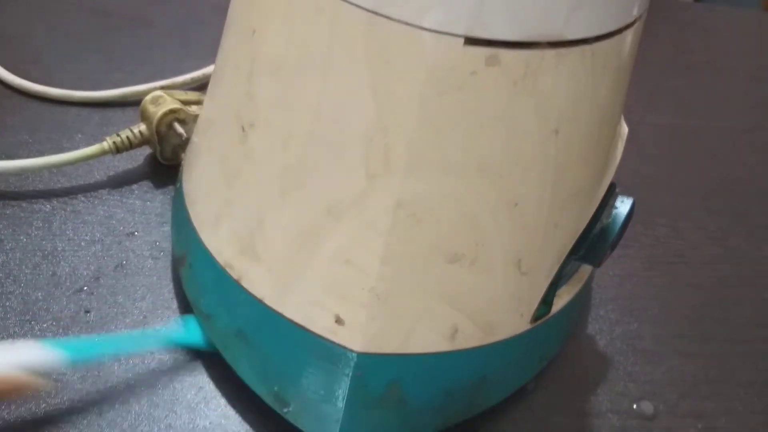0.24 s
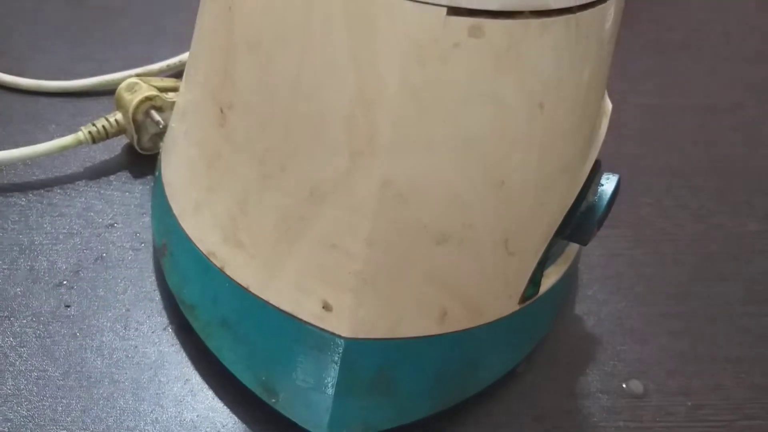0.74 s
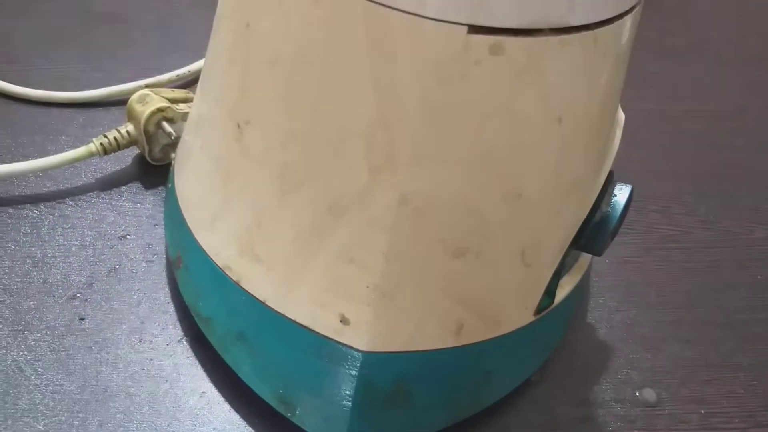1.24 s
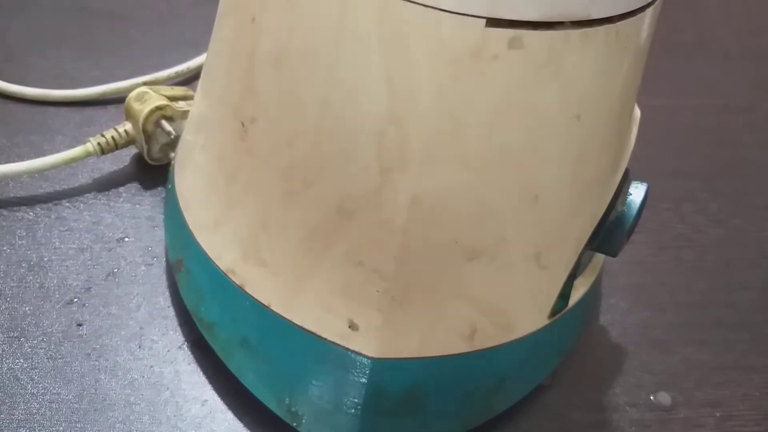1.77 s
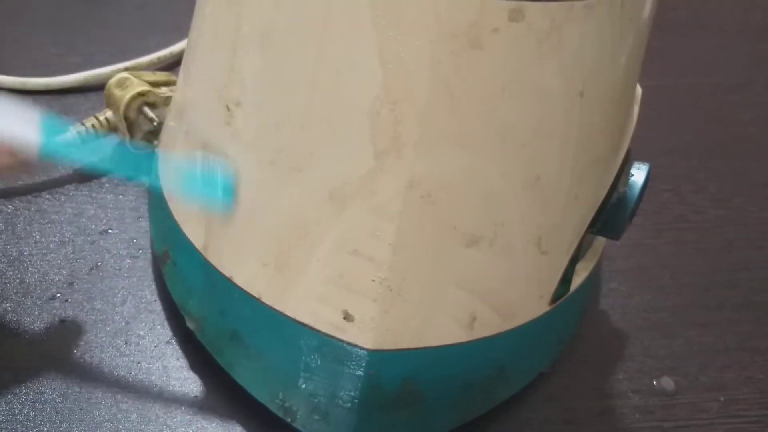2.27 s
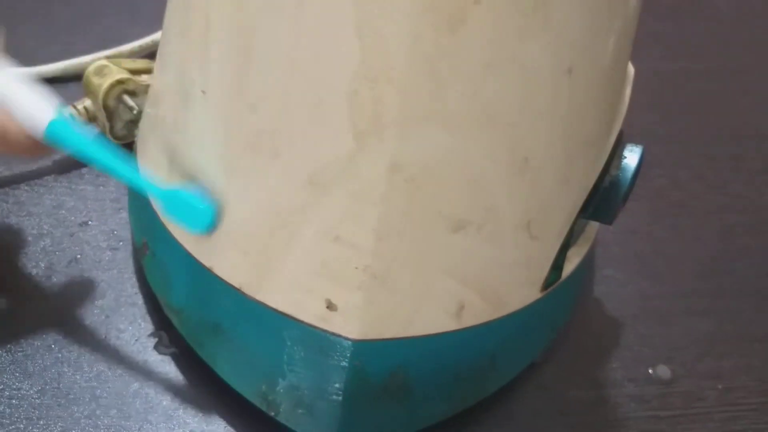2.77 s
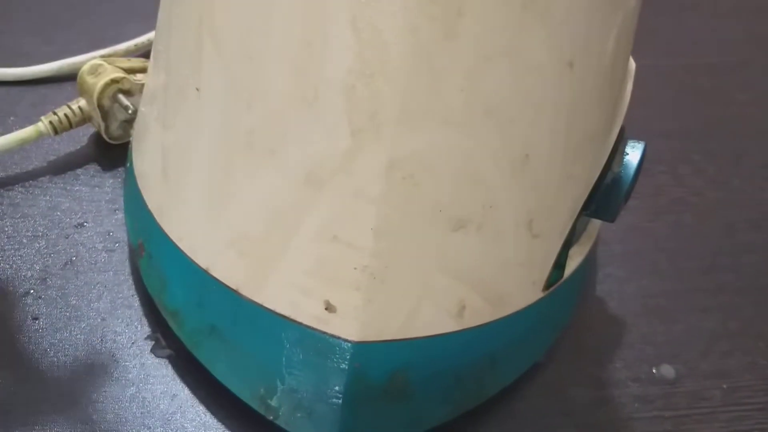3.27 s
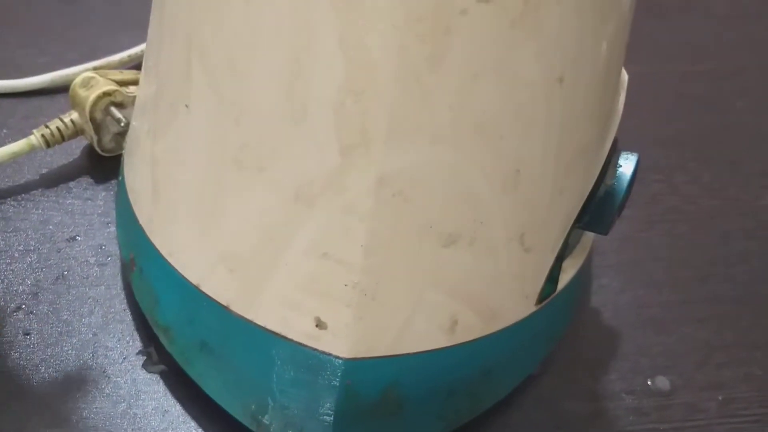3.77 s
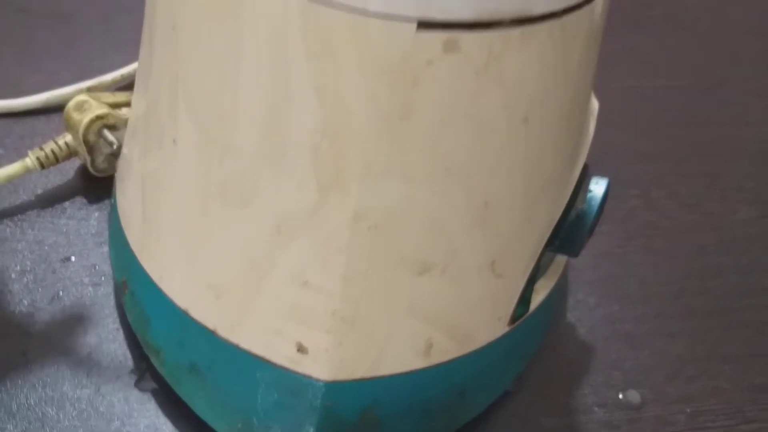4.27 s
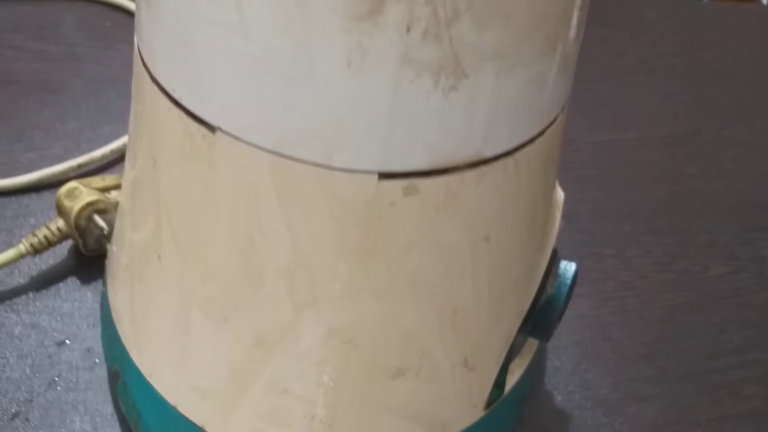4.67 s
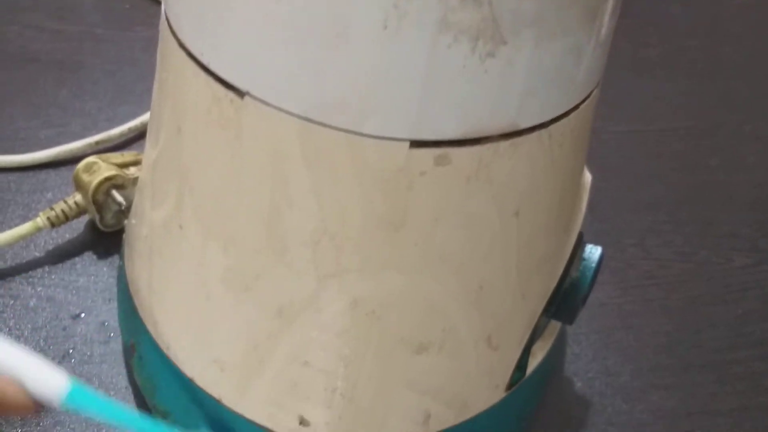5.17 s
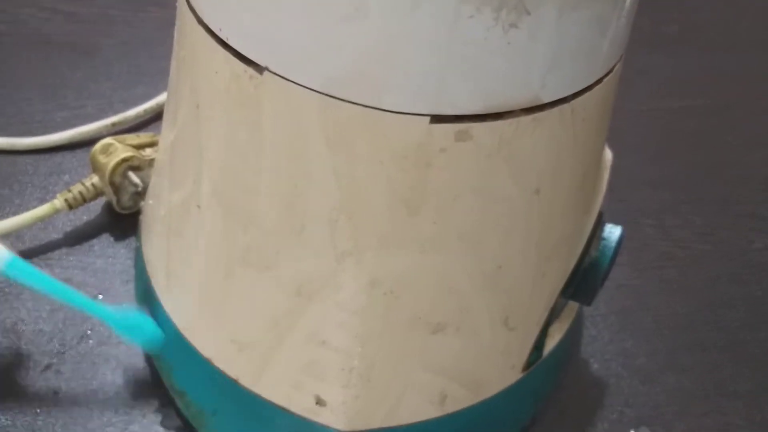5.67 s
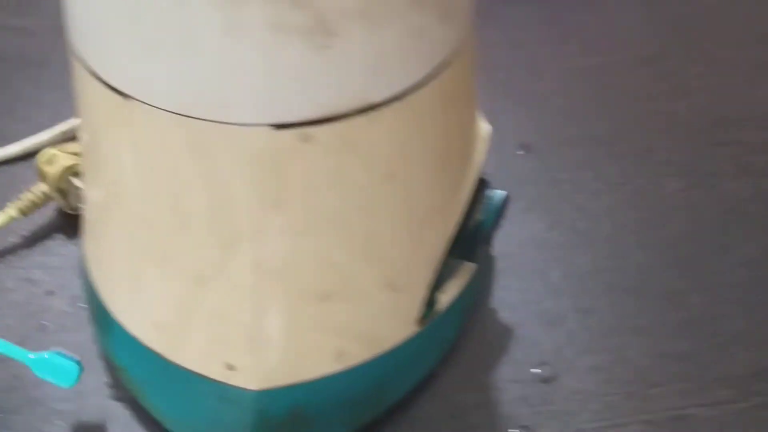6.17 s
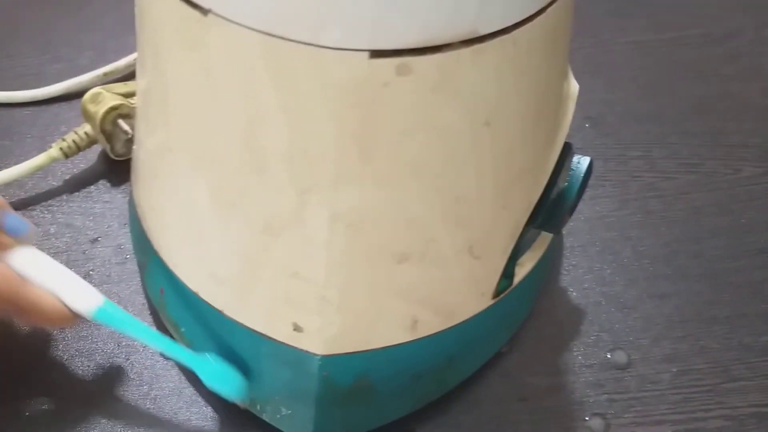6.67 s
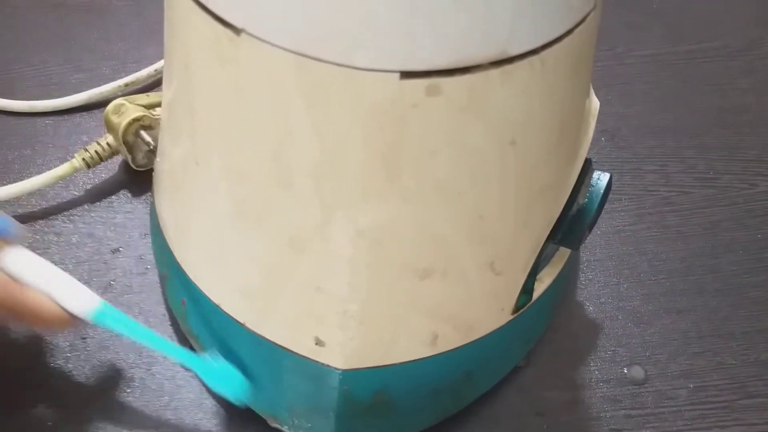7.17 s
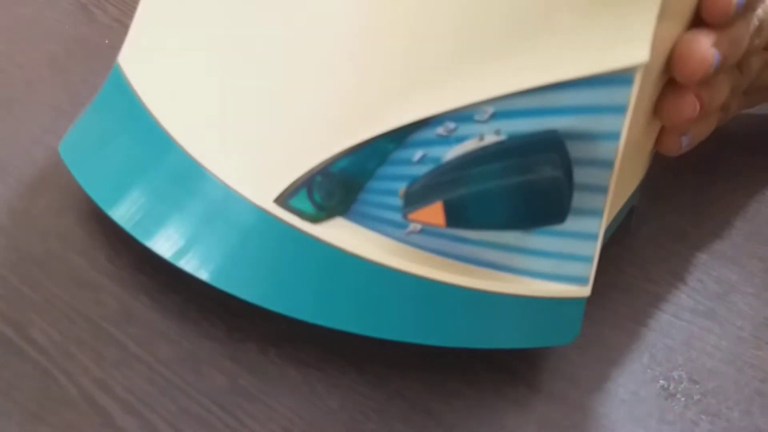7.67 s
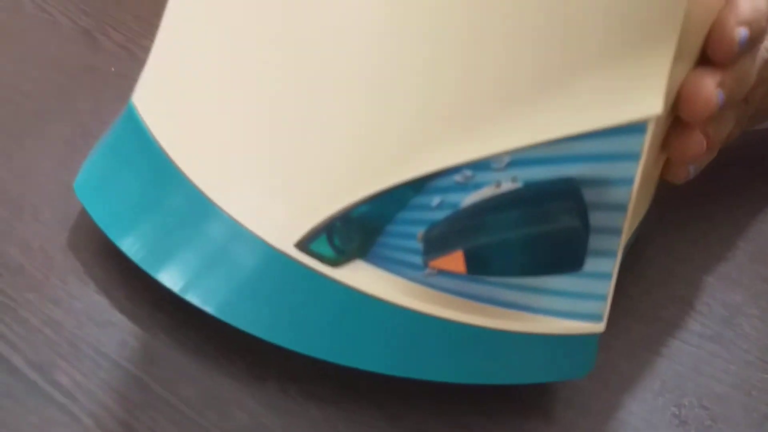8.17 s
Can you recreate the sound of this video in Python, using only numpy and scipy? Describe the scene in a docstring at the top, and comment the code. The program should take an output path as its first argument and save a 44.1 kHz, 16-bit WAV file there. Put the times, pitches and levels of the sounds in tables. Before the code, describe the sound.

A toothbrush scrubs a hollow plastic appliance housing, heard close and almost in mono, with slight kitchen reverberation. Loud, sharp clicks of the brush head come at about 0.15 seconds, followed by hard strokes and hollow knocks around 0.7 to 0.9 and one sharp crack at 1.2. The brushing stays light until about 2.3, then builds into high, hissy scratching, roughly five or six strokes a second. A click lands at 4.3, with a brief pause just after. The scrubbing resumes and turns harder and raspier around 5.7 to 6.1, with a cluster of sharp knocks that leave loose parts faintly ringing. Even strokes continue to about 7.4, then the rubbing becomes thinner and quieter. Near 8.3 come a short rasp and a soft scrape as the housing shifts on the table. A very faint low rumble and room air lie underneath.

```python
"""A toothbrush scrubs the plastic housing of a kitchen appliance, heard close and almost in mono.
Stick-slip friction of the bristles gives scratch, hiss and fizz; the brush head rasps and drives the
thin shell and the hollow body. These six paths filter the force of every stroke and knock.
Knocks also set loose parts ringing, and the kitchen reverberates. Near the end a hand shifts the
housing on the table. Underneath, a low rumble swells and fades with faint room air."""
import sys
import numpy as np
from scipy import signal
from scipy.fft import rfft, irfft, next_fast_len
from scipy.io import wavfile
from scipy.ndimage import map_coordinates

SR = 44100
rng = np.random.default_rng(int(sys.argv[2]) if len(sys.argv) > 2 else 0)


def output_pcm(signal):
    """Save a mono or channel-first signal as 16-bit PCM at the path in sys.argv[1].

    Samples are clipped to [-1, 1] before scaling.
    """
    pcm = np.clip(np.atleast_2d(signal).T, -1, 1) * 32767
    wavfile.write(sys.argv[1], SR, np.round(pcm).astype(np.int16))


N = 371747

# brush strokes; the last three columns are offsets from the level:
# (start [s], lift [s], level [dB], swell [dB], shell [dB], fizz [dB], rasp [dB])
STROKES = [(-.04, .044, -42, 1, -18.5, -3, -15.5), (0.062, 0.132, -45.5, 15, -10, -4.5, -10.5),
           (0.627, 0.666, -47, 10.5, -11.5, -15, -23.5), (0.695, 0.733, -45, 0.5, -11, -22, -14),
           (0.746, 0.85, -24.5, -3, -24.5, -13, -17.5), (.82, 1.05, -31, -25, -17, -10, -13),
           (1.081, 1.123, -48, -1.5, -34, -9.5, -24.5), (1.148, 1.205, -53, 3.5, -38, -9, -24.5),
           (1.3, 1.433, -56, 1.5, -21.5, -15, -8.5), (1.452, 1.54, -52, -6, -18.5, -13.5, -22.5),
           (1.543, 1.59, -53, 3.5, -35.5, -7.5, -30.5), (1.76, 1.935, -62.5, -8, -25, -9, -23.5),
           (1.964, 2.122, -61, 10.5, -31, -8, -34), (2.14, 2.256, -56, 9.5, -35.5, -6, -31),
           (2.289, 2.418, -54, 12.5, -34, -5.5, -25), (2.428, 2.538, -51.5, 14, -43, -6.5, -23),
           (2.54, 2.753, -41, -2, -37, -4.5, -29), (2.747, 2.963, -45.5, 9, -28, -2.5, -22),
           (2.958, 3.137, -30, -16.5, -26, 1.5, -19), (3.134, 3.337, -45.5, 8, -37, 0, -34),
           (3.343, 3.473, -46, 5, -32, 1, -39), (3.491, 3.602, -37.5, -3, -36, -0.5, -43.5),
           (3.632, 3.742, -48, 9, -34.5, 0.5, -44), (3.76, 3.894, -43.5, 3.5, -32, 0, -43),
           (3.895, 3.93, -37.5, 2, -39, 3, -50), (3.953, 4.123, -38.5, -2.5, -34, 0, -42),
           (4.145, 4.228, -57.5, -8.5, 7.5, -18, 1), (4.223, 4.322, -52.5, 10, -13, -9, -21),
           (4.337, 4.49, -36, -4, -12.5, -6.5, -15.5), (4.636, 4.811, -62, 27.5, -29.5, -9.5, -28.5),
           (4.806, 4.893, -42, -2.5, -20, -7, -10.5), (4.921, 5.074, -42, 0, -20, -8, -13.5),
           (5.119, 5.26, -37, -0.5, -30.5, -8, -20), (5.311, 5.438, -41.5, -1, -19.5, -6, -9.5),
           (5.491, 5.641, -47, 10.5, -24, -5, -17), (5.696, 5.802, -44.5, 11.5, -8, -7.5, -10.5),
           (5.787, 5.95, -37, -7.5, -0.5, -6, 4), (5.962, 6.12, -38, -31, 3.5, -2.5, 3),
           (6.212, 6.256, -44.5, 0, -29, -10, -28), (6.297, 6.387, -37.5, -2, -29.5, -8.5, -25.5),
           (6.424, 6.553, -41, 3.5, -17.5, -7, -10), (6.588, 6.709, -39, -1.5, -21.5, -6.5, -14),
           (6.748, 6.896, -44.5, 5, -15.5, -5.5, -9.5), (6.925, 7.073, -39.5, -3.5, -22.5, -6.5, -12.5),
           (7.089, 7.215, -44.5, 7, -17, -8.5, -9.5), (7.254, 7.435, -45, -9, -17.5, -4.5, -19),
           (7.428, 7.617, -56.5, 7.5, -14.5, -3.5, -15.5), (7.58, 8.07, -54, -1, -20, -2, -17),
           (8.044, 8.228, -58.5, 4.5, -13, -2.5, -8.5), (8.205, 8.326, -52, -2.5, 2.5, -0.5, 2),
           (8.32, 8.45, -57, -1.5, -21, 0, -5.5)]
# knocks of the brush head; the last four columns are offsets from the level:
# (time [s], level [dB], treble [dB], shell [dB], body [dB], room [dB])
KNOCKS = [(0.096, -38, 12, -18, -26, -6.5), (0.1271, -2, -3, -15.5, -19, -26),
          (.1413, 1, -32, -16.5, -26, -14), (0.153, -9.5, 1.5, -6, -14, -8),
          (0.6314, -24.5, -7, -24, -3, -5), (0.6654, -14, -14, -24.5, -24, -38),
          (0.71, -17.5, -20, -17.5, -12, -31), (0.766, -9.5, -9.5, -13.5, -18.5, -13.5),
          (0.785, -6.5, -16, -15.5, -45, -20), (0.8333, -10, -5.5, -12, -36, -10.5),
          (1.1053, -35.5, -12, -31, -46, -9.5), (1.2294, 1.5, -4, -23, -28.5, -15.5),
          (2.911, -23, 2, -17, -49, -33), (3.1717, -20.5, -2, -29, -47, -12),
          (3.319, -39, 12.5, -30, -44, -20), (3.6514, -43, 9, -14, -32, -10),
          (3.8129, -26.5, 4.5, -22, -35, -10), (3.9284, -41.5, 24, -34, -38, -22),
          (3.9874, -28.5, 5.5, -35, -25, -19), (4.1617, -23.5, -4, -8, -25, -19.5),
          (4.257, -41, 3, -20, -40, -15), (4.3243, -13, -2.5, -5.5, -40, -15),
          (4.661, -50, 6, -18, -40, -12), (4.8883, -25.5, -11, -21, -28, -17),
          (5.222, -19.5, -2, -49, -53, -15), (5.2672, -23, -22, -17, -48, -13),
          (5.5704, -33, 5, -17, -17, -14), (5.592, -23.5, -16.5, -13, -13.5, -34),
          (5.6591, -29, 3, 1.5, -32, -14), (5.7722, -18.5, -27, -6, -45, -20),
          (5.8343, -25, 2, 5, -35, -32), (5.8631, -3, -7, -10.5, -49, -20),
          (5.9136, -20.5, -12, -11, -32, -8), (5.9746, -14, -7.5, -14, -45, -12),
          (5.981, -13, -5.5, -31, -50, -28.5), (6.184, -55.5, -10, -0.5, 8.5, -18),
          (6.2057, -58, -3, 0.5, 14, -28), (6.241, -42.5, 9, -30, -26, -19),
          (6.4637, -30, -12, -4, -51, -14), (7.1147, -30.5, 2, -25, -41, -21),
          (7.165, -61, -10, -3, -2, -22), (7.5524, -44, -9.5, -3.5, -27, -20)]
# coupling at the point of contact:
# (start [s], scratch [dB], wall whistle [dB], body [dB], knock rasp re shell [dB], knock ring [dB])
COUPLING = [(0, 1.5, 0.5, -26.5, 9.5, -47.5), (.62, 6.5, 0, -6.5, -8, -41),
            (.74, 4, 0.5, -3.5, -8.5, -37.5), (1.07, 5.5, -1, -22, -0.5, -38),
            (1.75, -0.5, -1, -24, -0.5, -46), (3.165, 4, -1.5, -21, -8.5, -55.5),
            (4.13, -3.5, -1, -32, -16, -49.5), (4.63, 0, 2.5, -30.5, -0.5, -48),
            (6.17, -0.5, 2, -29, -2.5, -43), (7.25, 0.5, -12.5, -15, -2, -45.5),
            (8.05, 0.5, -9, -9.5, -3, -47)]
# scratch spectra: (frequency [Hz], relative density [dB])
SCRATCH = [(2120, -42), (3600, -11.5), (4890, 5), (5250, 4), (5650, 2), (6400, -11), (8320, -35.5),
           (14100, -120)]  # bristles on plastic
RIM = [(2600, -36), (3500, -21), (3900, -3), (4330, 3.5), (4720, -2.5), (5250, 1.5), (5800, -0.5),
       (6400, -19), (8300, -47.5)]  # two bands ring near the hollow rim
UPPER = [(2600, -44.5), (3600, -20), (4500, -4.5), (4900, -6), (5150, 5.5), (5450, -5.5), (5900, -4.5),
         (6400, -26), (8300, -54)]  # one rings on the upper wall
BACK = [(2500, -45), (3230, -18), (3600, -26), (4800, -12), (5150, 3), (5500, -11), (6400, -17),
        (8300, -50)]  # one whistles behind the housing
LATE_RUB = [(3700, -52), (4700, -6.5), (5400, -2.5), (6500, -9.5), (8300, -14.5), (9150, -3), (10300, -30)]  # from 7.27 s the rubbing sounds thinner, with a bright band near 9 kHz
# order of the scratch spectra; the last row only marks the end: (start [s], spectrum)
SPOTS = [(0, SCRATCH), (.62, RIM), (1.75, UPPER), (3.165, BACK), (4.14, SCRATCH),
         (7.27, LATE_RUB), (8.5, LATE_RUB)]
# spectra of the other five paths: (frequency [Hz], relative density [dB])
HISS = [(3760, -39.5), (6400, -10.5), (6850, -4), (8190, 6), (10000, -11), (13000, -47), (22000, -120)]  # bristles
FIZZ = [(5880, -39.5), (10000, -4), (13800, 2.5), (15900, -5)]  # bristle tips
RASP = [(1290, -33), (2200, -14.5), (2730, 5), (3600, 6), (4680, -6), (7920, -120)]  # handle and head
SHELL = [(500, -47.5), (850, -9), (1160, 0), (1320, 6.5), (2200, -0.5), (2860, -25), (4840, -120)]  # thin wall
BODY = [(120, -24.5), (200, 0), (411, 1.5), (705, -10), (850, -6), (1100, -37.5), (1870, -120)]  # hollow inside
# wall modes, one list each for scratch, rasp and shell: (frequency [Hz], bandwidth [Hz], gain [dB])
WALL_MODES = [
    [(5212, 92, -5.5)],
    [(2980, 300, -4), (3662, 370, -13.5)],
    [(997.4, 28, -13.5), (1200, 28, -11), (1396, 36, -10), (1595, 33, -5), (1916, 120, -10.5)],
]
# modes of loose parts in the housing: (frequency [Hz], level [dB], 60 dB decay time [s])
LOOSE_MODES = [(350, -12, .28), (802, -22, .4), (1071, -8, .45), (1238, 2, .38), (1733, -17, .3),
               (2143, -7, .5), (4260, 0, .3)]
# kitchen reverberation for scratch, hiss, fizz, rasp, shell and body: (60 dB decay time [s])
ROOM_T60 = [0.38, 0.33, 0.3, 0.39, 0.36, .35]
# level of the low rumble: (time [s], level [dB])
RUMBLE_LEVELS = [(0, -79), (.16, -62), (.35, -81), (.65, -92), (.82, -72), (1.1, -84), (2.37, -85.5),
                 (2.7, -76.5), (4.67, -78.5), (5.75, -74), (8.03, -73.5), (8.43, -70)]
# spectra of the lesser sources: (frequency [Hz], relative density [dB])
SHIFT = [(35, -40), (60, -21), (97, -1), (295, -8), (509, 3.5), (740, -6.5), (1430, -5), (2500, -7.5),
         (3250, -46), (5500, -120)]  # housing sliding on the table
RUMBLE = [(18, -50.5), (30, -26), (97, 2), (147, 2), (260, -17), (340, -66), (570, -120)]  # low rumble
AIR = [(120, -53), (200, -17.5), (340, -9.5), (589, -26.5), (5020, -15.5), (6480, -26.5), (8230, -9.5),
       (15900, -25)]  # quiet room
# stereo side signal: (frequency [Hz], level re mid [dB])
SIDE_LEVELS = [(40, -22.5), (150, -42.5), (1300, -56), (1550, -16.5), (2150, -12.5), (2500, -59.5),
               (8000, -61.5), (8600, -18), (10400, -14), (11300, -51)]

ATTACK_S, FALL_DB_PER_S = 0.037, 287  # the brush gathers speed; the sound dies after the lift
SCRATCH_PER_RASP, BODY_PER_SHELL, AIR_PER_RUMBLE = 0.29, 0.47, 0.6  # dB per dB
LEAN_DB = 1.5  # growth of rasp, shell and body as the head presses deeper along a stroke
HISS_REL_DB, AIR_DB = -5, -74.5
SHIFT_S, SHIFT_PEAK_DB, SHIFT_RISE_DB_PER_S, SHIFT_FALL_DB_PER_S = 8.27, -45, 250, 155
TOP_HZ = 16150


def brush():
    """Sliding friction drives the six paths; overlapping strokes add in power."""
    force = friction(flicks_per_s=600, spread_db=4.5, flick_share=.18, rough_db=1.5)
    start, lift, db, swell_db, shell_db, fizz_db, rasp_db = np.transpose(STROKES)
    t = np.arange(0, N + 32, 32)[:, None] / SR
    progress = np.clip((t - start) / (lift - start), 0, 1)
    level_db = db + swell_db * progress - FALL_DB_PER_S * np.maximum(t - lift, 0)
    stroke = np.clip((t - start) / ATTACK_S, 0, 1) * amp(level_db)
    pressed = stroke * amp(LEAN_DB * (progress - 2.5))
    scratch_db, _, body_db, *_ = coupling(start)
    tips_db = np.array([scratch_db + SCRATCH_PER_RASP * rasp_db, np.full_like(db, HISS_REL_DB), fizz_db])
    head_db = np.array([rasp_db, shell_db, body_db + BODY_PER_SHELL * shell_db])
    powers = np.hstack([stroke ** 2 @ amp(2 * tips_db.T), pressed ** 2 @ amp(2 * head_db.T)]).T
    envelopes = np.array([np.interp(np.arange(N) / SR, t[:, 0], np.sqrt(p)) for p in powers])
    # the patch under the bristles changes colour as it moves
    drift_db = 1.4 * np.array([wobble(18) for _ in powers])
    return envelopes * amp(drift_db) * force


def friction(flicks_per_s, spread_db, flick_share, rough_db):
    """Stick-slip friction: sliding noise plus impulses as single contacts let go, at unit rms."""
    size = amp(spread_db * np.clip(rng.standard_normal(N), -2, 2))
    flicks = (rng.random(N) < flicks_per_s / SR) * size * rng.choice([-1, 1], N)
    sliding = np.sqrt(1 - flick_share) * rng.standard_normal(N)
    force = sliding + np.sqrt(flick_share) * flicks / flicks.std()
    # contacts catch in bunches, so the force swells unevenly
    force *= amp(rough_db * wobble(150) + .7 * wobble(45))
    return force / force.std()


def coupling(time_s):
    """The driving point sets how strongly each part responds: the gains in dB in force at time_s."""
    rows = np.array(COUPLING)
    row = np.maximum(np.searchsorted(rows[:, 0], time_s, "right") - 1, 0)
    return rows[row, 1:].T


def rubbed_spots(force):
    """Source and filter: the scratch takes the spectrum of the spot being rubbed, and near the end a thinner,
    brighter one."""
    t = np.arange(N) / SR
    return sum(coloured(force * (t >= start) * (t < end), spectrum)
               for (start, spectrum), (end, _) in zip(SPOTS, SPOTS[1:]))


def wall(forces):
    """Forced resonance: the wall's modes swell and fade as the point of contact wanders."""
    return sum(resonance(force * amp(db + 5.5 * np.tanh(wobble(9))), hz, width_hz)
               for force, modes in zip(forces, WALL_MODES) for hz, width_hz, db in modes)


def knocks():
    """Impact excitation: returns a reverberant crack on each path, and the table's thump with ringing."""
    t = np.arange(int(.7 * SR)) / SR
    paths, thump_and_ring = np.zeros((6, N + len(t))), np.zeros(N + len(t))
    room_decay = amp(-60 * t / np.array(ROOM_T60)[:, None]) * (1 - np.exp(-t / 0.00067))
    thump = (1 - 700 * t) * np.exp(-700 * t) * (1 - np.exp(-3000 * t))  # one push on the table
    for start, db, treble_db, shell_db, body_db, room_db in KNOCKS:
        *_, rasp_db, ring_db = coupling(start)
        span = slice(round(start * SR), round(start * SR) + len(t))
        crack_noise, room_noise = rng.standard_normal((2, len(t)))
        crack = np.exp(-t * 350) * crack_noise
        crack[0] = 2.5  # the first contact is one sharp pulse
        path_db = np.array([0, treble_db, treble_db - 11, shell_db + rasp_db, shell_db, body_db])
        gains = amp(db - 8.5 + path_db)[:, None]
        paths[:, span] += gains * (crack + amp(room_db) * room_decay * room_noise)
        thump_and_ring[span] += amp(db + body_db - 9.5) * thump + loose_parts(t, db + ring_db)
    return paths[:, :N], thump_and_ring[:N]


def loose_parts(t, level_db):
    """Damped free vibration: each mode of the loose parts is a close pair, so it beats as it decays."""
    ring = np.zeros(len(t))
    for hz, mode_db, t60 in LOOSE_MODES:
        beat = 1 + .4 * np.cos(2 * np.pi * rng.uniform(8, 20) * t + rng.uniform(0, np.pi))
        fade = amp(level_db + mode_db - 60 * t / t60) * (1 - np.exp(-t / 0.0066))
        ring += fade * beat * np.sin(2 * np.pi * hz * t)
    return ring


def hand_shift():
    """Sliding friction: a palm pushes the housing a little over the table."""
    force = friction(flicks_per_s=580, spread_db=6, flick_share=0.15, rough_db=-1.5)
    t = np.arange(N) / SR - SHIFT_S
    level_db = SHIFT_PEAK_DB + np.minimum(SHIFT_RISE_DB_PER_S * t, -SHIFT_FALL_DB_PER_S * t)
    return coloured(amp(level_db) * force, SHIFT)


def background():
    """Amplitude-modulated noise: a low rumble and faint room air swell and fade together."""
    level_db = np.interp(np.arange(N) / SR, *np.transpose(RUMBLE_LEVELS))
    rumble_gain = amp(level_db + 2.7 * wobble(13))
    air_gain = amp(AIR_DB + AIR_PER_RUMBLE * (level_db - level_db.mean()))
    rumble = rumble_gain * coloured(rng.standard_normal(N), RUMBLE)
    return rumble + air_gain * coloured(rng.standard_normal(N), AIR)


def amp(db):
    """The decibel law: amplitude ratio of a level."""
    return 10 ** (np.asarray(db) / 20)


def along(points, hz):
    """Interpolation of (frequency [Hz], value) points on a logarithmic frequency axis."""
    knots_hz, values = np.transpose(points)
    return np.interp(np.log(hz + 1), np.log(knots_hz + 1), values)


def wobble(knots_per_s):
    """Smooth random modulation: a spline through Gaussian knots."""
    knots = rng.standard_normal(int(N * knots_per_s / SR) + 4)
    return map_coordinates(knots, [np.arange(N) * knots_per_s / SR])


def coloured(x, spectrum):
    """Minimum-phase filtering: x through a response of unit energy with this spectrum."""
    size = 2 ** 13
    closed = [(0, -120)] + list(spectrum) + [(SR / 2, -120)]
    magnitude = amp(along(closed, np.fft.rfftfreq(size, 1 / SR)))
    cepstrum = irfft(np.log(magnitude))
    cepstrum[1:size // 2] *= 2  # folding onto positive time makes the filter causal
    cepstrum[size // 2 + 1:] = 0
    response = irfft(np.exp(rfft(cepstrum)))[:size // 2]
    return signal.fftconvolve(x, response / np.linalg.norm(response))[:N]


def resonance(x, hz, width_hz):
    """A damped oscillator: x through one narrow resonance of unit energy."""
    radius = np.exp(-np.pi * width_hz / SR)
    feedback = [1, -2 * radius * np.cos(2 * np.pi * hz / SR), radius ** 2]
    return signal.lfilter(np.sqrt((1 - radius ** 2) / 2) * np.array([1, 0, -1]), feedback, x)


def stereo(mid):
    """Mid-side stereo: a weak, phase-shifted side signal colours left and right slightly differently."""
    size = next_fast_len(N + SR // 4)
    hz = np.fft.rfftfreq(size, 1 / SR)
    phase = along([(2000, 1.1), (8000, 1.9)], hz)  # left is stronger in the lows, right in the highs
    side = irfft(np.exp(1j * phase) * rfft(mid, size) * amp(along(SIDE_LEVELS, hz)), size)[:N]
    return np.array([mid + side, mid - side])


def scene():
    """Superposition: rubbing and knocks sound through the same paths, over the hand and background."""
    blows, thump_and_ring = knocks()
    scratch, hiss, fizz, rasp, shell, body = brush() + blows
    whistle_db = coupling(np.arange(N) / SR)[1]
    mid = rubbed_spots(scratch) + wall([scratch * amp(whistle_db), rasp, shell])
    for force, spectrum in (hiss, HISS), (fizz, FIZZ), (rasp, RASP), (shell, SHELL), (body, BODY):
        mid += coloured(force, spectrum)
    return stereo(mid + thump_and_ring + hand_shift() + background())


def record(dry):
    """Saturation and band limiting: peaks round off at full scale, and nothing passes above TOP_HZ."""
    clipped = dry / (1 + np.abs(dry) ** 6) ** (1 / 6)
    size = next_fast_len(N + SR // 4)
    lowpass = np.clip((TOP_HZ - np.fft.rfftfreq(size, 1 / SR)) / 300, 0, 1)
    return irfft(rfft(clipped, size) * lowpass, size)[:, :N]


dry = scene()
out = record(dry)
output_pcm(out)
```